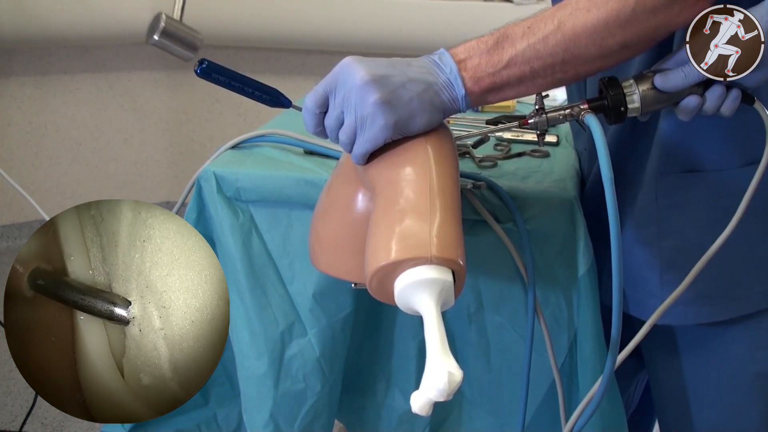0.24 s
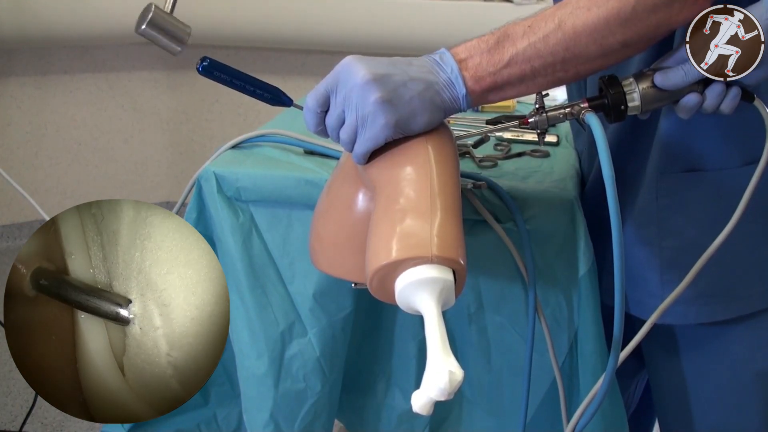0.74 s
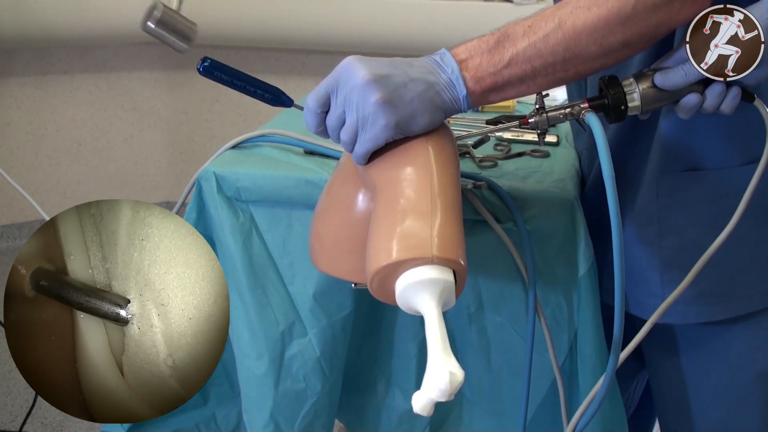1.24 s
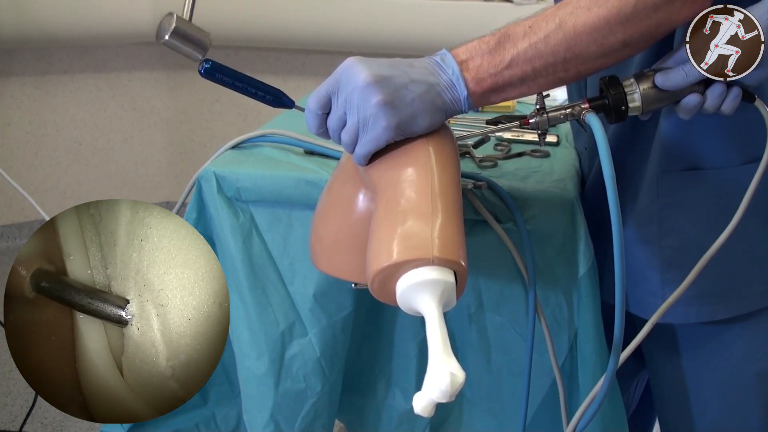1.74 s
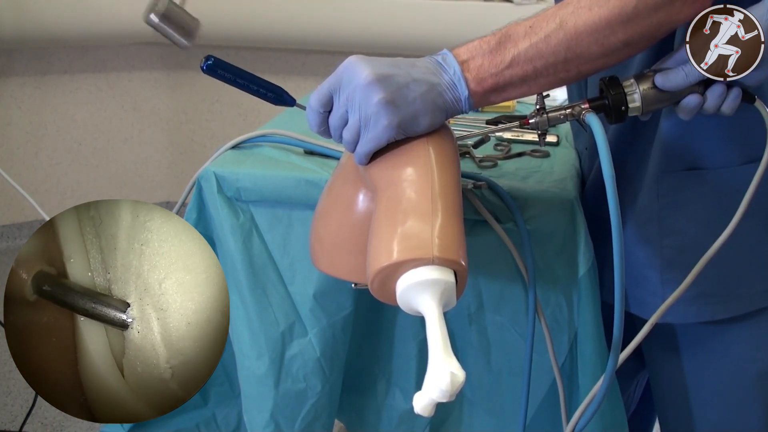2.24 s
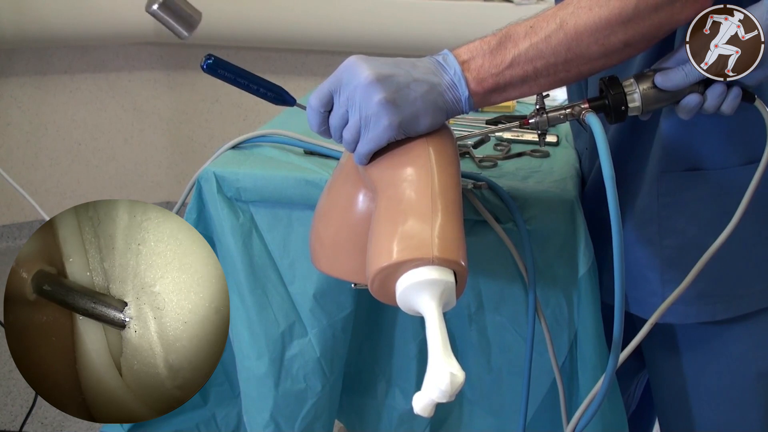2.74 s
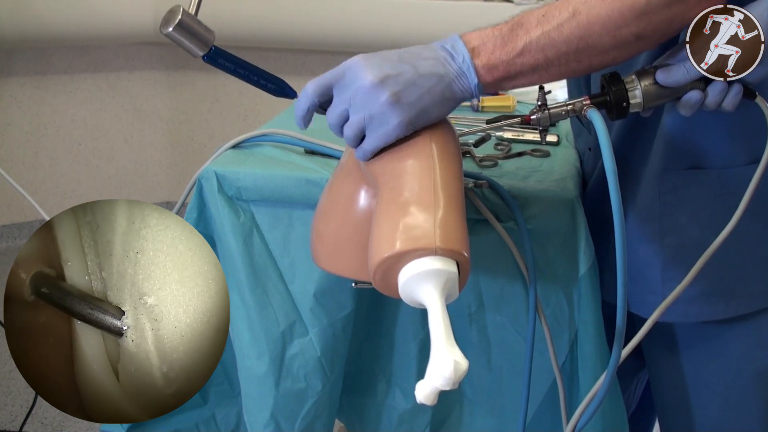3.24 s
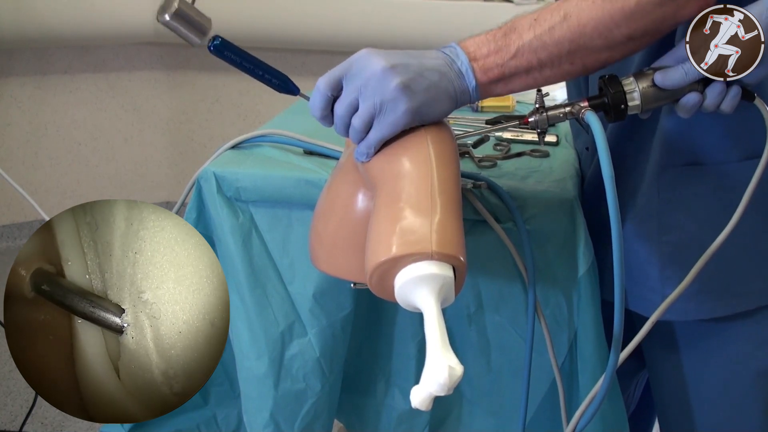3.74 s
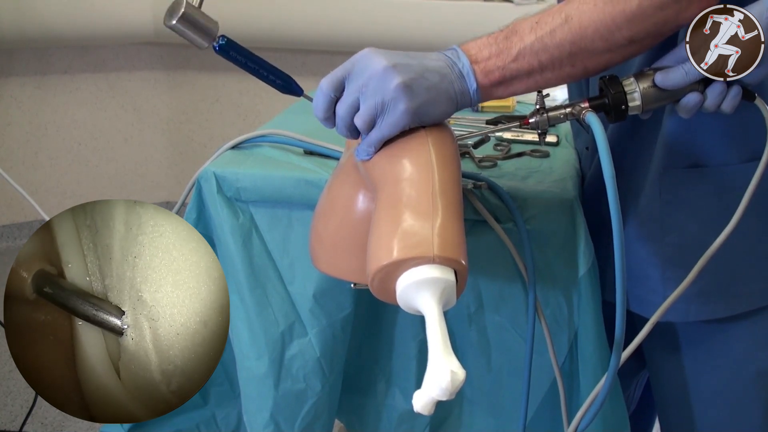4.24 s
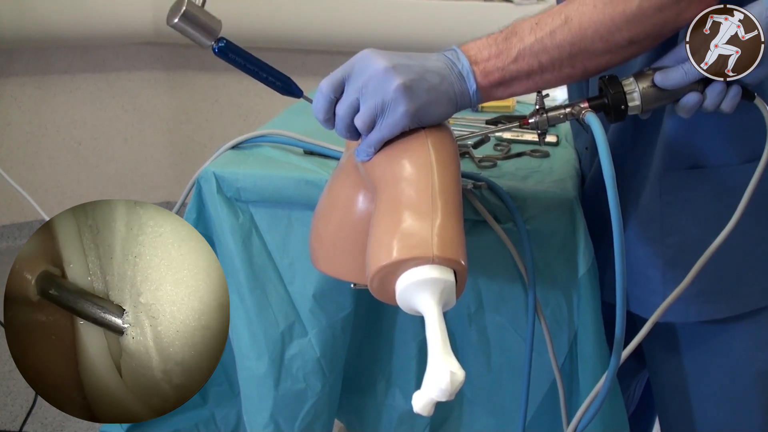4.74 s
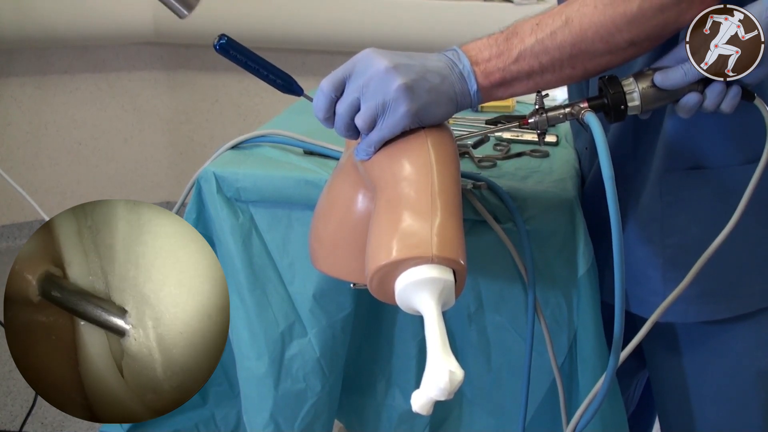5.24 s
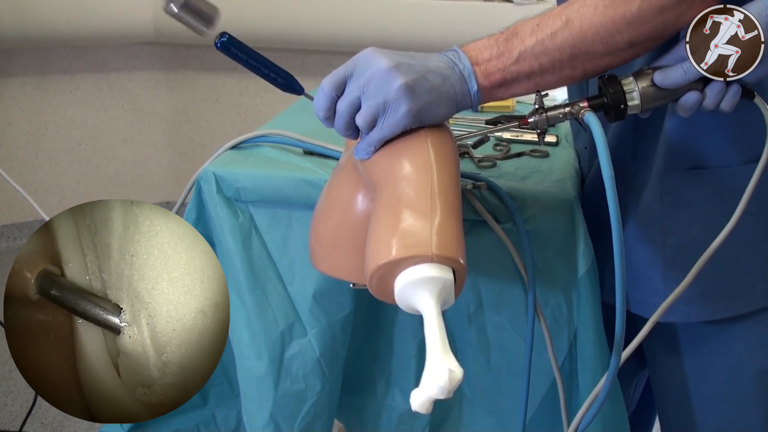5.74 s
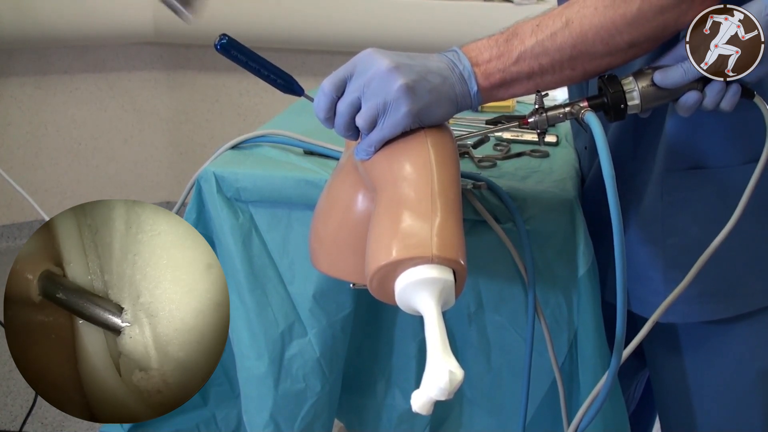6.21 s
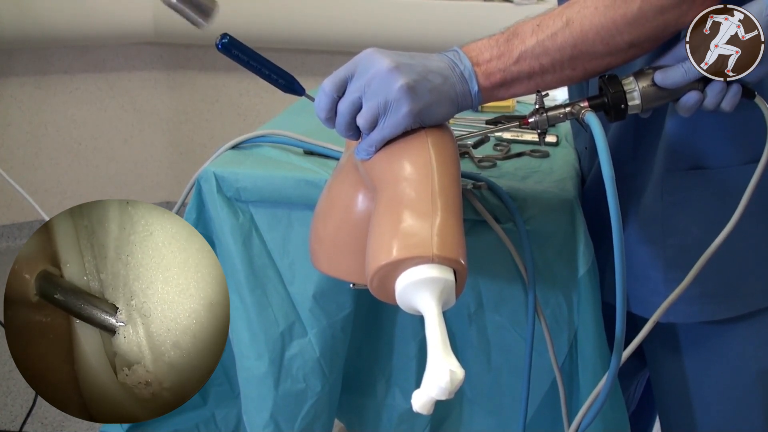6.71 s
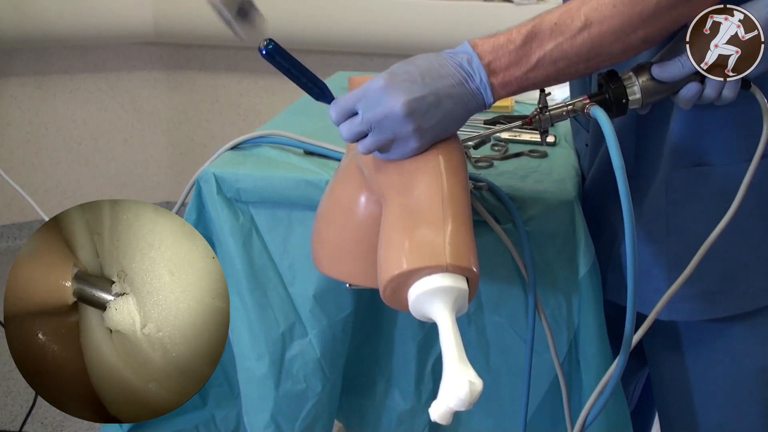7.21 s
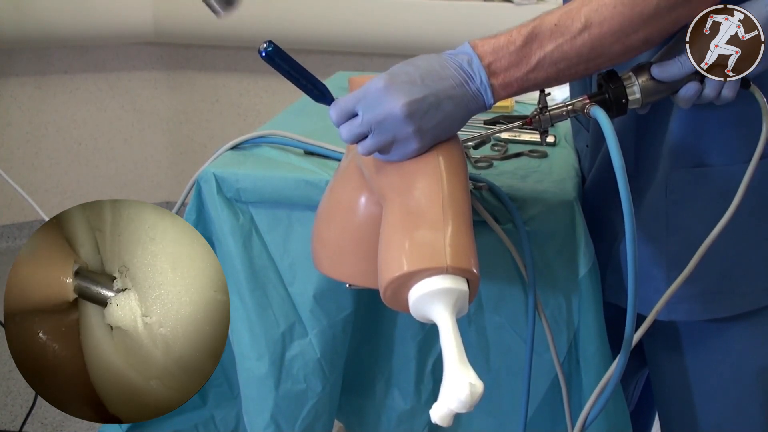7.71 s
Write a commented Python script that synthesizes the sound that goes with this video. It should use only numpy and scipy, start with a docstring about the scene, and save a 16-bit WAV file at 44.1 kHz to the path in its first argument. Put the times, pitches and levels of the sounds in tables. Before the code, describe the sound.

Bright metallic taps with a hollow knock and short ring, about three per second, ending in louder, deeper-driven blows over a soft ventilation hum.

```python
"""First run: a small steel mallet taps a hand-held steel pick into a model bone; a second run follows in
another hole, its last four blows driven deep. Each blow clicks steel on steel (shaped pulses and noise),
clanks the steel and knocks the bone (damped modes), rings the shaft until the grip damps it and sways the
padded table; then the mallet rebounds lightly. Table-top echo, sparse early echoes and a small hard room's
noise tail answer. An equipment fan (noise, whirr, blade tone) hums throughout."""
import sys
import numpy as np
from scipy import signal
from scipy.fft import rfft, irfft
from scipy.io import wavfile

SR = 44100
rng = np.random.default_rng(int(sys.argv[2]) if len(sys.argv) > 2 else 0)


def to_wav(s):
    """Save 16-bit WAV."""
    ch = np.atleast_2d(s).T  # columns
    pcm = np.round(np.clip(ch, -1, 1) * 32767)  # PCM
    wavfile.write(sys.argv[1], SR, pcm.astype(np.int16))


N = 351463
BLOW_SAMPLES, ATTACK_SAMPLES = 11025, 441


def undb(db):
    """Decibels to amplitude gain."""
    return 10 ** (np.asarray(db) / 20)


def fade(t, t60_s):
    """Free exponential decay, 60 dB in t60."""
    return np.exp(-np.log(1000) * t / t60_s)


def level(x, db, size=ATTACK_SAMPLES):
    """Set the rms of the first samples."""
    return x * undb(db) / np.sqrt(np.mean(x[:size] ** 2))


def along(hz, points, axis=1):
    """Interpolate a table column on a log-frequency axis."""
    points = np.array(points)
    return np.interp(np.log(hz + 1), np.log(points[:, 0]), points[:, axis])


def noise(points, size, axis=1):
    """Gaussian noise coloured by one column of a table."""
    gain = undb(along(np.fft.rfftfreq(size, 1 / SR), points, axis))
    return irfft(rfft(rng.standard_normal(size)) * gain, size)


def pulse(points, axis=1, size=BLOW_SAMPLES):
    """Minimum-phase click coloured by one column: starts at once, dies quickly."""
    gain = undb(along(np.fft.rfftfreq(size, 1 / SR), points, axis))
    cepstrum = irfft(np.log(gain), size)
    # fold the cepstrum onto positive time
    cepstrum[1:size // 2] *= 2
    cepstrum[size // 2:] = 0
    return irfft(np.exp(rfft(cepstrum)), size)


def ring(modes, seat, t, detune, scatter_db):
    """Damped modes, one a row; each blow lands differently and shifts their pitch and share."""
    modes = np.array(modes)
    chance = rng.standard_normal((len(modes), 2))
    hz = modes[:, 0] * (1 + detune * chance[:, 0])
    t60_s = modes[:, 1]
    size = undb(modes[:, 2 + seat] + scatter_db * chance[:, 1]) / np.sqrt(t60_s)
    return size[:, None] * np.sin(2 * np.pi * hz[:, None] * t) * fade(t, t60_s[:, None])


def add(track, s, sound):
    """Mix a sound in at time s."""
    i = int(s * SR)
    track[i:i + len(sound)] += sound[:N - i]


def later(x, s):
    """Delay a sound by s seconds."""
    return np.pad(x, (int(s * SR), 0))[:len(x)]


# Blows: [t/s, level/dB; re blow: shaft ring/dB (high: loose grip), brightness/dB (high: mallet lands square),
# rebound/dB]
BLOWS = [(0.0394, -53, -7, -11, -26), (0.1793, -32.5, -23, 3.5, -24), (.3981, -30, 4.5, -2, -15),
         (.6219, -28.5, -1, -0.5, -11), (.8744, -27, 2.5, 1, -24), (1.143, -26.5, -0.5, 0, -24),
         (1.4306, -25, 2, 0.5, -22), (1.721, -25.5, 7.5, -1.5, -11), (2.0263, -25, 4, 0.5, -8),
         (2.3277, -25.5, 4.5, -0.5, -10), (2.613, -25, 9, -0.5, -18), (2.914, -27.5, 0.5, 0.5, -9.5),
         (3.189, -29, -24, 1, -18), (3.4234, -41.5, -23, -5.5, -28), (3.7013, -27, -7.5, 2, -14),
         (3.964, -27, 0, -1, -9), (4.2324, -24, -5, -2.5, -24), (4.506, -23, 7, 0, -14),
         (4.794, -23, 6, 2, -18.5), (5.094, -22, -1, 0.5, -24), (5.3832, -22.5, 1, 1.5, -24),
         (5.6895, -21.5, -1.5, 0.5, -18), (5.9942, -21, 1.5, 3.5, -24), (6.318, -20.5, 3, 3, -16),
         (6.6308, -21.5, 3.5, 1.5, -24), (6.94, -15.5, -31, 1, -24), (7.2701, -15, -26, 0, -13),
         (7.6026, -15.5, -34, 1, -14), (7.9299, -16, 0, 1.5, -17)]
# Seat of the pick (first hole, second hole, driven deep):
# [from t/s; re blow: clank/dB, tick/dB, snap/dB; shaft t60/s before grip scaling]
PICK_SEATS = [(0, -3, 0.66, -29, 0.016), (3.55, -3, 0.5, -22, 0.033), (6.8, -5, -0.91, -8.5, .07)]
RING_DOUBLING_DB = 10.5  # looser grip: shaft t60 doubles per this much more ring
SNAP_DB_PER_BRIGHTNESS_DB = 1.2
CLANK_DB_PER_RING_DB = 0.1  # a tight grip also muffles the other steel modes
REBOUND_S = .0157


def mallet(ring_db=-5.0, padding_db_per_db=0.6, travel_s=0.00038):
    """All blows, each part following blow strength: direct sound and sound spread into the room."""
    direct, spread, t = np.zeros(N), np.zeros(N), np.arange(BLOW_SAMPLES) / SR
    for s, strength_db, loose_db, bright_db, bounce_db in BLOWS:
        seat = sum(s > row[0] for row in PICK_SEATS[1:])
        _, seat_clank_db, seat_tick_db, seat_snap_db, seat_t60_s = PICK_SEATS[seat]
        clank_db = strength_db + seat_clank_db + CLANK_DB_PER_RING_DB * loose_db
        tick_db = strength_db + seat_tick_db + bright_db
        snap_db = strength_db + seat_snap_db + SNAP_DB_PER_BRIGHTNESS_DB * bright_db

        clank = level(steel(seat, t), clank_db)
        shaft_t60_s = seat_t60_s * 2 ** (loose_db / RING_DOUBLING_DB)
        note = level(shaft(t, shaft_t60_s), strength_db + loose_db + ring_db)
        add(direct, s, clank + note)
        add(direct, s, level(mirrored(contact(seat, t), db=-2.5), tick_db))
        add(direct, s, level(mirrored(snap(t), db=-13), snap_db))
        add(direct, s + REBOUND_S, level(rebound(seat, t), strength_db + bounce_db))

        # bone answers once the blow has run down the shaft; padding stiffens under hard blows
        bump = undb(padding_db_per_db * strength_db) * table(t)
        add(direct, s + travel_s, level(bone(seat, t), strength_db) + bump)

        # summed over all directions, only the shaft note stands out
        add(spread, s, spread_thud(seat, strength_db) + note)
        add(spread, s, spread_clack((clank_db + tick_db) / 2) + spread_snap(snap_db))
    return direct, spread


# Pick and mallet-head modes: [f/Hz, t60/s, relative level/dB: first hole, second hole, driven deep]
STEEL_MODES = [(1450, 0.087, -36.5, -64, 8.5), (1768, 0.083, -42, -6.5, -21), (1915, 0.048, -6, -9, -3),
               (2300, 0.019, -7, 3, -7), (2598, 0.051, -4, 0.5, 9), (2785, 0.077, -35.5, -1, -2),
               (3084, 0.06, -11, -44, -14), (3617, 0.038, -5, 3, 13.5), (4100, 0.0035, -43, 1.5, 9),
               (4160, 0.012, -33, -6, 12.5), (4840, 0.042, -19, -22, -6), (5480, 0.06, -64, -12.5, -3)]


def steel(seat, t):
    """Clank: neighbouring bending modes swing in opposite directions."""
    signs = (-1) ** np.arange(len(STEEL_MODES))
    return signs @ ring(STEEL_MODES, seat, t, detune=0.0069, scatter_db=3.5)


# Shaft bending mode, split in two by the grip: [f/Hz, relative level/dB]
SHAFT_SPLIT = [(3400, 0), (3450, -4)]
# Higher shaft modes: [f/Hz, level re main note/dB]
SHAFT_OVERTONES = [(7190, -13), (9300, -22.5)]


def shaft(t, t60_s, rise_s=0.0033, detune=.004):
    """Ring that builds up as the blow runs down the shaft and dies in the grip."""
    modes = 0
    for hz, db in SHAFT_SPLIT + SHAFT_OVERTONES:
        mode_hz = hz * (1 + detune * rng.standard_normal())
        modes = modes + undb(db) * np.sin(2 * np.pi * mode_hz * t)
    return modes * (1 - np.exp(-t / rise_s)) * fade(t, t60_s)


# Steel-on-steel tick colour: [f/Hz, relative level/dB: first hole, second hole, driven deep]
TICK_COLOUR = [(400, -14, -14, -14), (1500, -7, -6, -3), (3000, -5, -5, -2), (5100, -13, -7, -5),
               (5800, -4, -1, -3), (6500, -2, -1, 2), (6950, 2, 0, -4), (7450, -10, -2, -5),
               (8500, -15, -13, -10), (9300, -8, -17, -9), (10000, -16, -17, -13), (10900, -17, -13, -9),
               (12500, -22, -24, -17), (16000, -23, -27, -20)]


def contact(seat, t, chatter_t60_s=0.022):
    """Steel on steel: one hard click plus decaying chatter of equal initial rms."""
    chatter = noise(TICK_COLOUR, len(t), axis=1 + seat) * fade(t, chatter_t60_s)
    return level(pulse(TICK_COLOUR, axis=1 + seat), 0) + level(chatter, 0)


def rebound(seat, t, top_hz=7800):
    """Second, lighter mallet touch: the same tick, low-passed."""
    return signal.sosfilt(signal.butter(4, top_hz, fs=SR, output="sos"), contact(seat, t))


# First snap of the contact: [f/Hz, relative level/dB]
SNAP_COLOUR = [(1000, -18), (5000, 5), (8000, 11.5), (9300, 3), (11000, 5), (13000, -20), (16000, 11)]


def snap(t, grit_db=-3, grit_t60_s=0.0167):
    """First instant of the blow: a sharp spike plus a little decaying grit."""
    grit = noise(SNAP_COLOUR, len(t)) * fade(t, grit_t60_s)
    return level(pulse(SNAP_COLOUR), 0) + level(grit, grit_db)


def spread_snap(db, spray_db=3):
    """Snap radiated in all directions: the spike alone."""
    return level(pulse(SNAP_COLOUR), db + spray_db)


# Bone modes: [f/Hz, t60/s, relative level/dB: first hole, second hole, driven deep]
BONE_MODES = [(310, 0.054, -12.5, -9, -23), (461, 0.028, -8, 4.5, -5), (580, 0.06, -2.5, 4, 4.5),
              (693, 0.018, 2.5, 4.5, 1.5), (870, 0.079, -14, -2.5, -33), (984, 0.068, -9, 2, -8),
              (1120, 0.079, -41, -58, -5.5), (1304, 0.17, -12, -15, -22)]


def bone(seat, t, lowest_hz=290):
    """Hollow knock of damped modes; the bone is too small to radiate bass."""
    knock = -ring(BONE_MODES, seat, t, detune=.03, scatter_db=1.5).sum(axis=0)
    return signal.sosfilt(signal.butter(2, lowest_hz, "high", fs=SR, output="sos"), knock)


# Knock over all directions: [f/Hz, relative level/dB: first hole, second hole, driven deep]
THUD_COLOUR = [(121, -22.5, -34, -35), (218, -11, -20, -17), (297, -9, -8.5, -7.5), (452, -1.5, -1, 0.5),
               (617, 3.5, 1.5, 1.5), (810, -3.5, -11.5, -10.5), (1112, -6.5, -4, -4),
               (1350, -12, -21, -10.5), (3000, -30, -25, -38), (8000, -39, -44, -55)]


def spread_thud(seat, db):
    """Knock radiated in all directions: a pulse of smoother colour than the modes."""
    return level(pulse(THUD_COLOUR, axis=1 + seat), db)


# Steel clack over all directions: [f/Hz, relative level/dB]
CLACK_COLOUR = [(500, -60), (1400, -4), (2100, 6.5), (2700, 2.5), (4200, -3.5), (5800, 1), (7100, 6),
                (8200, -8), (11000, -14.5), (16000, -15)]


def spread_clack(db, clack_db=4.5):
    """Steel clack radiated in all directions, as one pulse."""
    return level(pulse(CLACK_COLOUR), db + clack_db)


# Padded-table sway: [f/Hz, t60/s, relative level/dB]
SWAY_MODES = [(36.9, 0.56, -37), (75.6, 0.39, -35), (119.8, 0.05, -12.5)]


def table(t, rise_s=0.0019, detune=0.023):
    """Soft bump: damped low modes of the padded table with a smooth onset."""
    sway = 0
    for hz, t60_s, db in SWAY_MODES:
        mode_hz = hz * (1 + detune * rng.standard_normal())
        sway = sway + undb(db) * np.sin(2 * np.pi * mode_hz * t) * fade(t, t60_s)
    return sway * (1 - np.exp(-t / rise_s))


def mirrored(x, db, mean_lag_s=.00178, wander=.025):
    """Table-top reflection; its lag varies (share of lag) as the pick wanders in the hand."""
    return x + undb(db) * later(x, mean_lag_s * (1 + wander * rng.standard_normal()))


def nearby(x, db=-11, t60_s=0.015, first_s=0.0027):
    """Sparse early echoes from the arms, tray and table: decaying cubed noise."""
    t = np.arange(SR // 4) / SR
    echoes = rng.standard_normal(len(t)) ** 3 * fade(t, t60_s) * (t > first_s)
    return signal.fftconvolve(x, undb(db) * echoes / np.linalg.norm(echoes))[:N]


# Room response: [f/Hz, relative level/dB, t60/s]
ROOM_BANDS = [(40, 4.5, 0.17), (120, 4, 0.62), (248, 1, 0.4), (510, -6, 0.46), (1040, -7, 0.53),
              (2200, -16, 0.6), (3150, -7, 0.64), (6700, -16, 0.52), (10300, -10, 0.41), (16000, -19, 0.23)]


def room(x, build_s=0.00055):
    """Diffuse tail: overlapping noise bands, each with its own decay."""
    t = np.arange(SR) / SR
    hz = np.fft.rfftfreq(SR, 1 / SR)
    white = rfft(rng.standard_normal(SR))
    centres_hz, tail = np.array(ROOM_BANDS)[:, 0], 0
    for share, (_, db, t60_s) in zip(np.eye(len(ROOM_BANDS)), ROOM_BANDS):
        # triangular band, zero at the neighbouring centres
        band = irfft(white * along(hz, np.column_stack([centres_hz, share])), SR)
        decay = fade(t, t60_s) * (1 - np.exp(-t / build_s))
        tail = tail + undb(db) * band * decay / np.linalg.norm(decay)
    return signal.fftconvolve(x, tail)[:N]


# Fan and ventilation noise colour: [f/Hz, relative spectral density level/dB]
AIR_COLOUR = [(20, 16.5), (32, -25), (55, 2.5), (95, 0.5), (150, -2), (280, 5), (600, -2.5), (1100, -4.5),
              (1600, -10), (3000, -18), (6000, -27), (10000, -31), (16000, -36.5)]


def fan(air_db=-52, blade_hz=911, blade_db=-61, whirr_width_hz=120, whirr_db=-68.5):
    """Steady rush of air, a faint blade tone and a narrow noise whirr around it."""
    hz = np.fft.rfftfreq(N, 1 / SR)
    resonance = 1 / (1 + (2 * (hz - blade_hz) / whirr_width_hz) ** 2)
    whirr = irfft(rfft(rng.standard_normal(N)) * resonance, N)
    blades = np.sin(2 * np.pi * blade_hz * np.arange(N) / SR)
    air = level(noise(AIR_COLOUR, N), air_db, size=N)
    return air + level(whirr, whirr_db, size=N) + level(blades, blade_db, size=N)


def scene(direct_share_db=-11, walls_s=0.0065):
    """Blows, echoes, room and fan at one microphone."""
    direct, spread = mallet()
    walls = later(room(spread + undb(direct_share_db) * direct), walls_s)
    return (direct + nearby(direct) + walls + fan())[None]


def record(dry, ceiling=.92, top_hz=16300):
    """Clip peaks at the ceiling, then cut the top steeply."""
    low_pass = signal.ellip(10, .2, 90, top_hz, fs=SR, output="sos")
    return signal.sosfilt(low_pass, np.clip(dry, -ceiling, ceiling))


dry = scene()
out = record(dry)
to_wav(out)
```